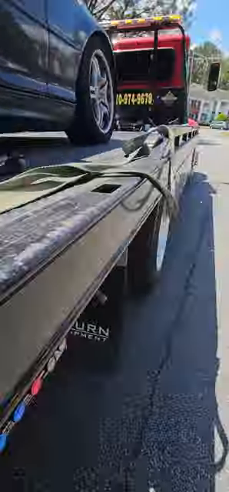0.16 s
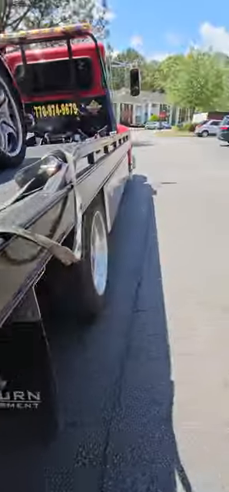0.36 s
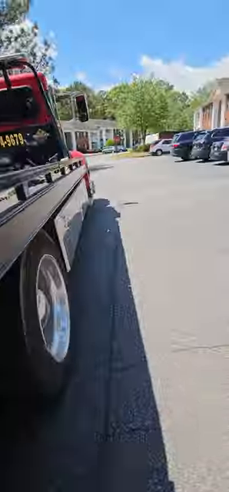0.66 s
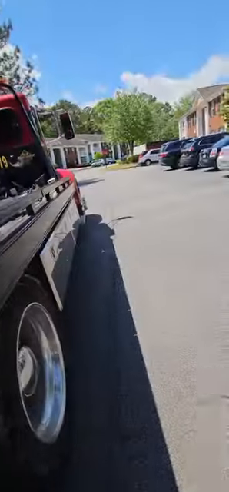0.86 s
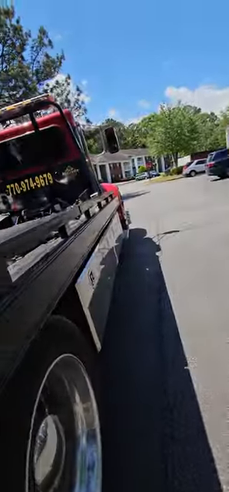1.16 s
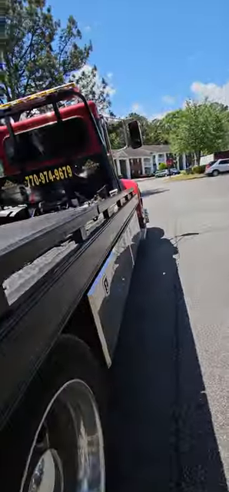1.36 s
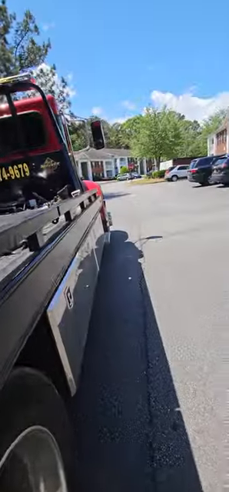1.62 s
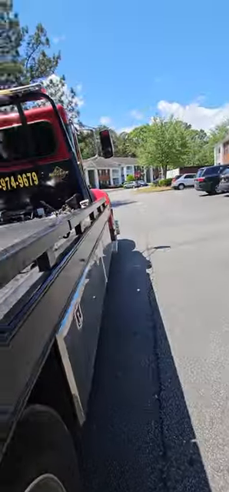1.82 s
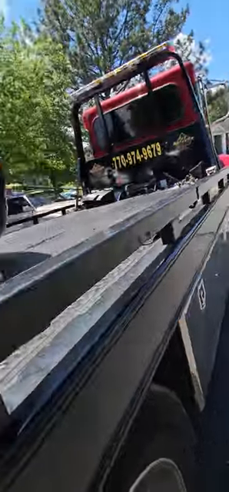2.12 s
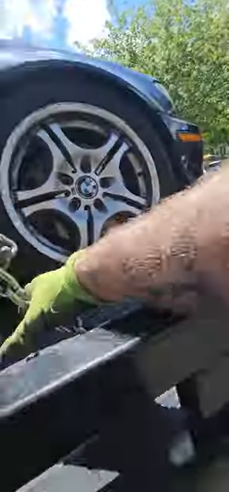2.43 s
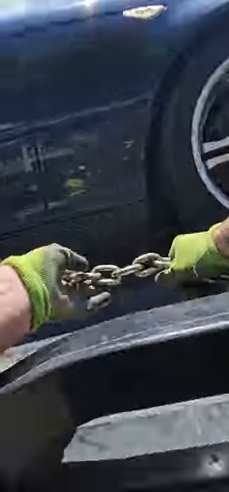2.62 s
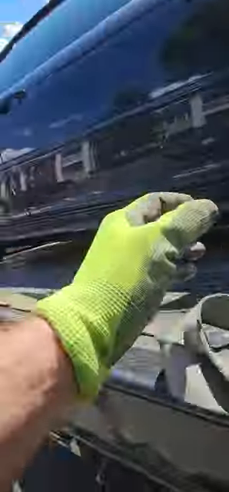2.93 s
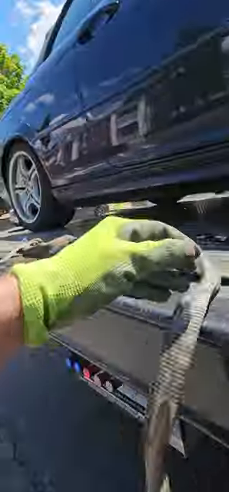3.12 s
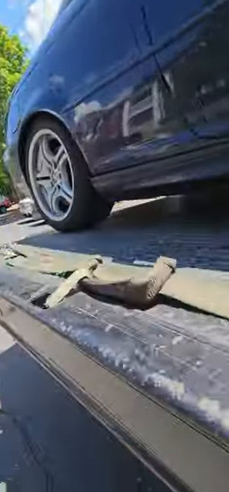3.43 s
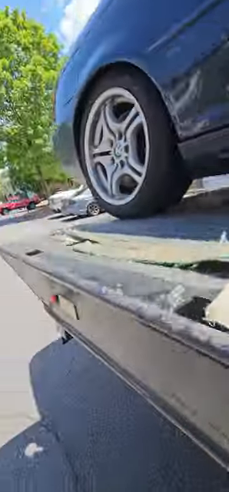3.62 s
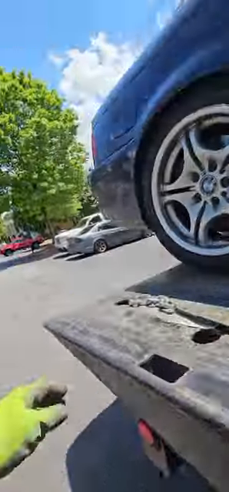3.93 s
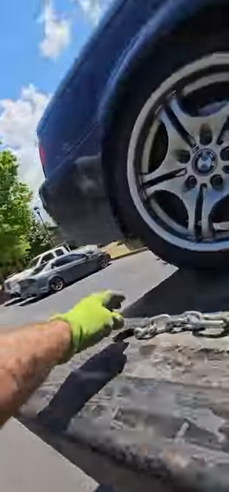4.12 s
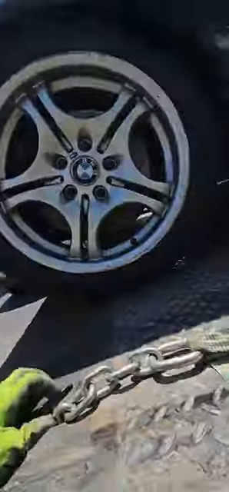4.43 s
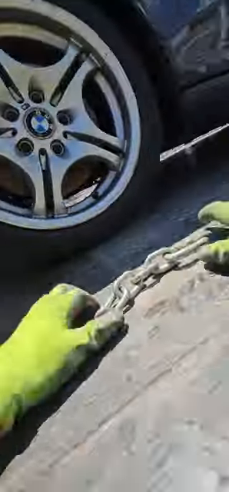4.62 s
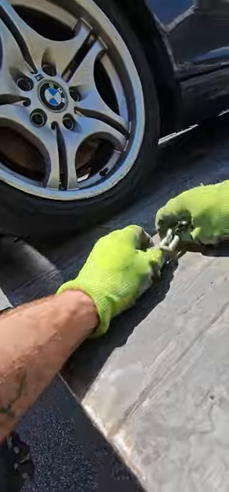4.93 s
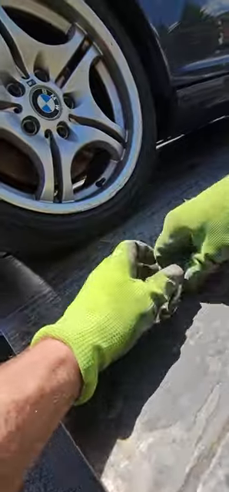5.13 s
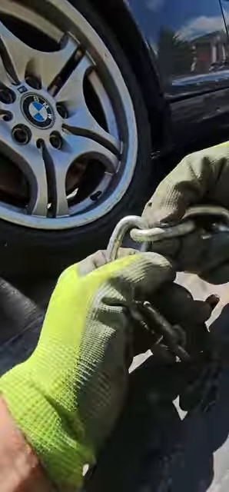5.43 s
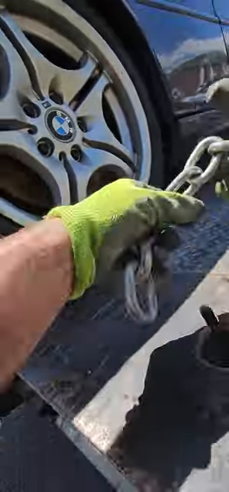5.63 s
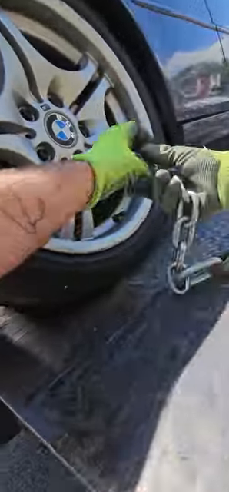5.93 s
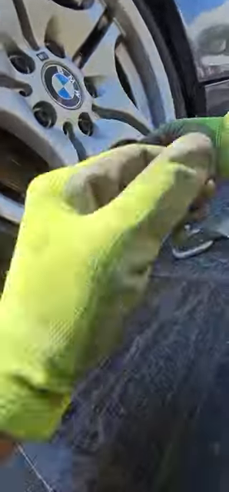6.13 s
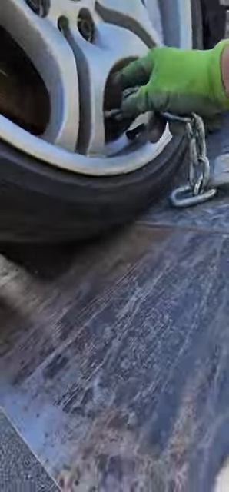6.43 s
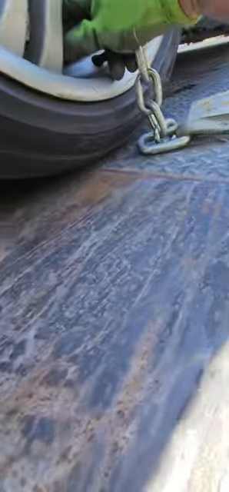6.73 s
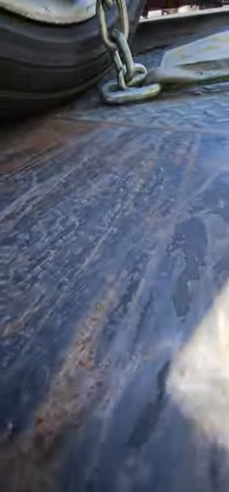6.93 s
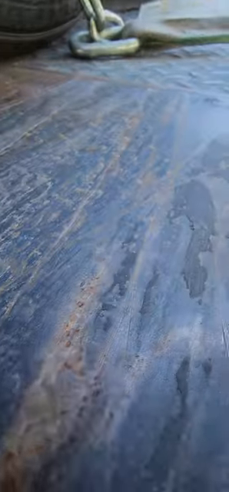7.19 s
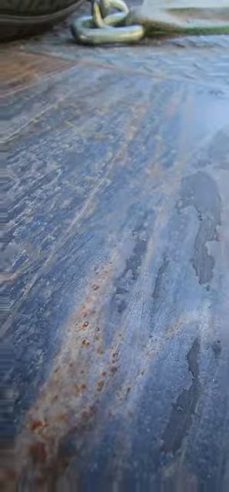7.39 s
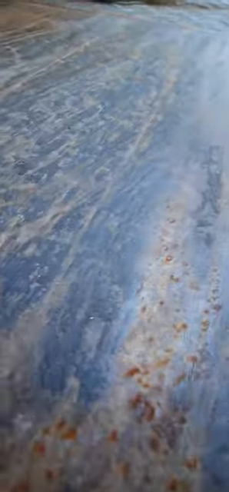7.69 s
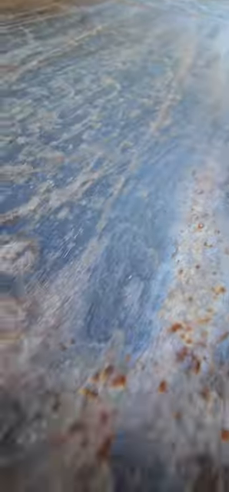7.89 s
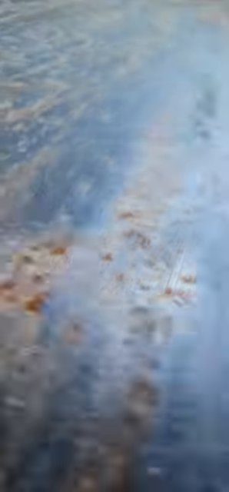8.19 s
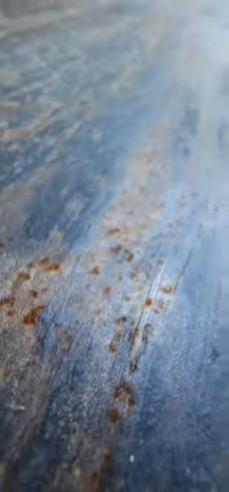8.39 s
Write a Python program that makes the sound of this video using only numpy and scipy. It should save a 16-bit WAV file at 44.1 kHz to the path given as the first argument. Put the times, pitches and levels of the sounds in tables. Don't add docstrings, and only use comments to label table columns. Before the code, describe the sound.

Outdoors, a large diesel truck idles without stopping: low pulsing exhaust, rough engine clatter, faint gear whine and airy hiss, with a steady low-mid pump hum that shifts in strength as the hand-held microphone moves. A hard, dull double knock opens the scene, then mostly engine until about 1.7 s. Around 1.9-2.6 s metal scrapes, thuds and snaps, with a small buckle and bright links ringing. At 2.8 s a chain drops heavily on the steel deck, with small clinks trailing to 3.3 s. The engine is alone, somewhat softer, until 4.3 s, when a second chain is dragged and gathered with glove rustle, clustering around 4.9-5.1 and 5.4-6.1 s with thuds and a ringing hook. Sparse light taps follow from 6.2 to 7.8 s; the hum swells, then chain jangles sharply around 8 s, ending in small clinks by 8.5 s.

```python
import sys
import numpy as np
from scipy import signal
from scipy.fft import rfft, irfft, next_fast_len
from scipy.io import wavfile
from scipy.ndimage import uniform_filter1d, map_coordinates

SR = 44100
rng = np.random.default_rng(int(sys.argv[2]) if len(sys.argv) > 2 else 0)


def voltage_ratio(decibels):
    exponent = np.asarray(decibels, float) / 20
    return 10 ** exponent


def master(y):
    cut = np.clip(np.atleast_2d(y).T, -1, 1)
    pcm = np.round(cut * 32767)
    wavfile.write(sys.argv[1], SR, pcm.astype(np.int16))


N = 377055

# time in seconds, exhaust loudness in dB, nearness of the engine bay in dB.
ENGINE_DISTANCE = [(0.0, -24.5, -33), (0.09, -26.5, -36), (0.55, -28.5, -31.5), (2.0, -29.5, -27.5),
                   (2.83, -32, -33.5), (3.31, -32.5, -45), (4.2, -29.5, -47), (4.43, -30, -45.5),
                   (5.17, -32, -35.5), (5.76, -29.5, -44.5), (6.14, -29.5, -36.5), (6.38, -29, -43),
                   (7.86, -26.5, -38.5), (8.5, -27.5, -37.5), (8.55, -34, -43)]


def unit(x):
    return x / np.sqrt(np.mean(x ** 2) + 1e-20)


def along(points, hz):
    f, v = np.transpose(points)
    return np.interp(np.log(hz + 1), np.log(f + 1), v)


def curves(rows):
    s, *cols = np.transpose(rows)
    return [np.interp(np.arange(N) / SR, s, c) for c in cols]


def wobble(rate):
    knots = rng.standard_normal(int(N * rate / SR) + 4)
    return map_coordinates(knots, [np.arange(N) * rate / SR])


def filtered(x, response):
    m = next_fast_len(N + SR // 2)
    return irfft(rfft(x, m) * response(np.fft.rfftfreq(m, 1 / SR)), m)[..., :N]


def resonant(x, peaks):
    def response(f):
        total = 0
        for k, (centre, width, db) in enumerate(peaks):
            damping = 1j * f * width
            total = total + (-1) ** k * voltage_ratio(db) * damping / (centre * centre - f * f + damping)
        return unit(np.abs(total)) * np.exp(1j * np.angle(total))
    return filtered(x, response)


def tuned(x, hz, sharpness):
    return signal.lfilter(*signal.iirpeak(hz, sharpness, SR), x) * np.sqrt(SR * sharpness / (np.pi * hz))


def sides(pan_db):
    return voltage_ratio(np.array([pan_db / 2, -pan_db / 2]))


def add(out, s, sound):
    part = out[:, round(s * SR):][:, :sound.shape[1]]
    part += sound[:, :part.shape[1]]


def rush(spectrum, patchy_db):
    # frequency in Hz, likeness of left and right (1 is mono).
    likeness = [(60, 0.79), (130, 0.54), (290, 0.37), (640, 0.24), (1410, 0.028), (3100, -0.18),
                (6820, 0.033), (15000, -0.077)]
    z = signal.stft(rng.standard_normal((2, N)), nperseg=512)[2]
    field = uniform_filter1d(rng.standard_normal(z.shape[1:]), size=6, axis=0)
    field = uniform_filter1d(field, size=14, axis=1)
    pair = signal.istft(z * voltage_ratio(patchy_db * unit(field)), nperseg=512)[1][:, :N]

    def response(hz):
        angle = np.arccos(np.clip(along(likeness, hz), -1, 1)) / 2
        return voltage_ratio(along(spectrum, hz)) * [np.cos(angle), np.sin(angle)]
    mid, side = filtered(pair, response)
    return np.array([mid + side, mid - side]) / np.sqrt(np.mean(mid ** 2))


def tones(turns, orders, unsteady_db, rate):
    total = 0
    for multiple, db in orders:
        swell = np.sqrt(2) * voltage_ratio(db + unsteady_db * wobble(rate))
        total = total + swell * np.sin(2 * np.pi * (multiple * turns + rng.random()))
    return total


def rustle_db():
    # start in seconds, length in seconds, level in dB.
    rustles = [
        (4.235, 2.1, -48),
        (7.699, .85, -52.5),
    ]
    t = np.arange(N) / SR
    return sum(voltage_ratio(db) * np.clip(np.minimum(t - s, s + length - t) / 0.057, 0, 1) for s, length, db in rustles)


def engine():
    # shaft order, level in dB; exhaust orders set by the firing.
    firing_orders = [(3, -24.5), (4, -12.5), (5, -23), (6, 2.5), (7, -23)]
    # shaft order, level in dB; the other orders from the block.
    odd_orders = [(8, -3.5), (9, -1.5), (10, -18.5), (12, -11.5), (13, -16), (15, -10), (17, -14),
                  (18, -23)]
    cylinders = [0, -1.8, -1.5]
    # frequency in Hz, level in dB re clatter.
    gear_whines = [(441, -9.5), (834, -3.5)]
    # frequency in Hz, level in dB per Hz.
    clatter_colour = [(90, -44.5), (150, -11.5), (350, -17), (530, -15.5), (1000, -25), (2000, -28.5),
                      (6000, -44.5), (9000, -87.5)]
    # frequency in Hz, level in dB per Hz.
    rumble_colour = [(12, -51), (20, -16), (65, -4), (195, -25), (247, -6), (304, -21), (700, -26),
                     (910, -62.5)]
    # frequency in Hz, level in dB per Hz.
    hiss_colour = [(1800, -16), (3500, -11), (5400, -17), (8500, -18), (10200, -25.5), (11500, -15.5),
                   (12500, -19.5), (16000, -12.5)]
    exhaust_db, clatter_db = curves(ENGINE_DISTANCE)
    near_db = clatter_db + 38
    odd_db = exhaust_db - 5 + 0.26 * near_db
    hiss_db = -51 + 1.24 * near_db
    t = np.arange(N) / SR
    shaft_hz = 11.56
    turns = shaft_hz * t + 0.013 * wobble(3)
    low = voltage_ratio(exhaust_db) * tones(turns, firing_orders, unsteady_db=-1.0, rate=2.7)
    low = low + voltage_ratio(odd_db) * tones(turns, odd_orders, unsteady_db=3.5, rate=4.6)
    rumble = voltage_ratio(odd_db + 1.5) * rush(rumble_colour, patchy_db=1.5)
    firing = len(cylinders) * turns
    strength = voltage_ratio(np.array(cylinders)[firing.astype(int) % len(cylinders)])
    knock = strength * np.exp(-3 * (firing % 1))
    clatter = voltage_ratio(clatter_db + 1.5) * unit(1 + 0.443 * knock) * rush(clatter_colour, patchy_db=1.5)
    whine = tones(t + 2e-4 * wobble(7), gear_whines, unsteady_db=1.5, rate=4)
    gears = voltage_ratio(1.06 * (clatter_db + 30.5) - 40.5) * whine
    hiss = np.hypot(voltage_ratio(hiss_db), rustle_db()) * rush(hiss_colour, patchy_db=0.6)
    return low * sides(1.0)[:, None] + rumble + clatter + gears + hiss


def pump():
    # time in seconds, hum in dB, octave in dB, left over right in dB.
    pump_distance = [(0.0, -19, -31.5, 2), (0.45, -21, -43, -3.5), (2.31, -25, -32.5, 6),
                     (2.66, -20, -47, 5), (2.83, -25.5, -34.5, 6), (3.36, -33.5, -52.5, 3),
                     (4.86, -23.5, -38, 2.5), (5.93, -22, -49, 2), (7.76, -17, -44.5, 6.5),
                     (8.55, -21, -47, 7)]
    # multiple of the pump note, level in dB re clatter.
    overtones = [(3, -14.5), (4, -22), (6, -19.5), (9, -24.5), (12, -23)]
    hum_db, octave_db, pan_db = curves(pump_distance)
    clatter_db = curves(ENGINE_DISTANCE)[1]
    pump_hz = 248.66
    turns = pump_hz * np.arange(N) / SR + 0.047 * wobble(9)
    hum = voltage_ratio(hum_db) * tones(turns, [(1, 0)], unsteady_db=-0.18, rate=26) * sides(pan_db)
    octave = voltage_ratio(octave_db) * tones(turns, [(2, 0.0076)], unsteady_db=-1.0, rate=8.3) * sides(-pan_db / 2)
    return hum + octave + voltage_ratio(clatter_db) * tones(turns, overtones, unsteady_db=2.5, rate=6.4)


def ducking():
    # time in seconds, gain change in dB, recovery in seconds.
    ducks = [
        (2.838, 2.5, 0.25),
        (5.08, -1, 0.067),
        (6.09, -1.5, 0.23),
        (8.066, -5.5, 0.46),
    ]
    t = np.arange(N) / SR
    return voltage_ratio(sum(db * (t > s) * np.exp(-np.abs(t - s) / back) for s, db, back in ducks))


def yard(x):
    t60, delay = 0.07, 120
    t = np.arange(SR // 6) / SR
    tail = rng.standard_normal((2, len(t))) * voltage_ratio(-60 * t / t60)
    late = np.pad(x, ((0, 0), (delay, 0)))
    return signal.fftconvolve(late, tail / np.linalg.norm(tail[0]), axes=1)[:, :N]


def grit(count, depth_db, width):
    a, b, c = rng.standard_normal((3, count))
    grains = voltage_ratio(depth_db * np.repeat(c[::40], 40)[:count])
    return grains * np.array([a + width * b, a - width * b])


def clang(burst, hz, sharpness):
    plate = [0.975, 1.276, 0.756, 1.73, 2.23]
    tune, size = rng.standard_normal((2, len(plate)))
    level = voltage_ratio(2.5 * size - 8 * np.abs(np.log2(plate)))
    pitch = hz * np.array(plate) * (1 + 0.03 * tune)
    return sum(g * tuned(burst, f, sharpness) for g, f in zip(level, pitch))


def deck_scrapes():
    # start in seconds, length in seconds, level in dB, colour in Hz.
    scrapes = [(1.885, 0.28, -32.5, 636), (2.831, 0.082, -25.5, 2575), (4.276, 0.25, -41, 2010),
               (5.09, 0.073, -30, 2870), (6.089, 0.21, -37.5, 1505), (7.083, 0.055, -40, 1050),
               (7.204, 0.17, -44.5, 1140), (8.063, 0.086, -32.5, 1700), (8.463, 0.077, -43, 1195),
               (4.297, 0.2, -45, 594)]
    out = np.zeros((2, N))
    for s, length, db, hz in scrapes:
        u = np.arange(round(length * SR)) / (length * SR)
        links = voltage_ratio(3.5 * np.repeat(rng.standard_normal(len(u) // 300 + 1), 300)[:len(u)])
        stroke = np.sin(np.pi * u ** 0.6) * links * grit(count=len(u), depth_db=3, width=0.8)
        rubbed = tuned(stroke, hz, sharpness=0.71)
        add(out, s, voltage_ratio(db) * clang(rubbed, hz, sharpness=6.8) / 4)
    return out


def deck_thuds():
    # time in seconds, peak in dB, pitch in Hz.
    thuds = [(1.985, -16.5, 552), (2.039, -9.5, 394), (2.794, -5.5, 550), (2.816, -6, 654),
             (2.838, -8, 513), (2.922, -12, 570), (4.988, -15, 430), (5.447, -11.5, 506),
             (6.093, -11.5, 540)]
    out, t = np.zeros((2, N)), np.arange(SR // 7) / SR
    for s, db, hz in thuds:
        blow = voltage_ratio(db - 13.5 - 60 * t / 0.24) * grit(count=len(t), depth_db=4.5, width=0.23)
        add(out, s, tuned(blow, hz, sharpness=3.1))
    return out


def deck_knocks():
    # time in seconds, peak in dB, colour in Hz, decay by 60 dB in seconds.
    bumps = [(0.022, -3, 1510, 0.033), (0.049, -9, 3720, 0.032), (0.34, -27.5, 950, 0.055),
             (2.795, -11.5, 1010, 0.049), (2.836, -2, 1740, 0.068), (2.923, -21.5, 1080, 0.08),
             (3.018, -18, 1220, 0.069), (3.112, -17, 2180, 0.081), (3.257, -28.5, 1180, 0.066)]
    # seconds, dB, Hz, seconds.
    snaps = [(1.743, -19.5, 2180, 0.03), (1.942, -23, 1377, 0.042), (2.038, -9, 886, 0.066),
             (2.093, -21.5, 980, 0.041), (2.325, -13, 973, 0.045), (2.36, -18.5, 2030, 0.047),
             (2.432, -18, 3700, 0.035), (2.529, -22.5, 3490, 0.035), (2.556, -13.5, 3230, 0.026)]
    # seconds, dB, Hz, seconds.
    drags = [(4.312, -26.5, 1480, 0.043), (4.329, -20, 1470, 0.046), (4.373, -25, 2150, 0.032),
             (4.406, -12.5, 1830, 0.034), (4.806, -27, 996, 0.05), (4.875, -11.5, 2150, 0.077),
             (4.982, -9.5, 880, 0.06), (4.987, -9.5, 2180, 0.05), (5.005, -7, 2090, 0.058),
             (5.071, -18.5, 924, 0.041), (5.109, -14, 1740, 0.062), (5.234, -22.5, 1460, 0.062),
             (5.281, -20.5, 1680, 0.088), (5.445, -7.5, 1560, 0.043), (5.512, -22.5, 3240, 0.058),
             (5.841, -28, 4140, 0.064), (5.945, -15, 2070, 0.041)]
    # seconds, dB, Hz, seconds.
    taps = [(6.052, -4, 2030, 0.054), (6.091, -6.5, 1530, 0.054), (6.113, -8.5, 1600, 0.045),
            (6.24, -25.5, 1540, 0.054), (6.254, -16, 1340, 0.1), (6.3, -25.5, 1220, 0.045),
            (6.429, -24.5, 1280, 0.045), (6.539, -30, 1500, 0.045), (6.745, -22, 1060, 0.073),
            (6.83, -23.5, 1600, 0.037), (7.102, -24, 1090, 0.057), (7.321, -23.5, 2210, 0.028),
            (7.336, -19.5, 3240, 0.061), (7.854, -24.5, 1460, 0.051), (7.977, -11.5, 2840, 0.045),
            (8.037, -25.5, 1510, 0.054), (8.068, -13.5, 1536, 0.062), (8.167, -21, 1680, 0.041),
            (8.256, -15.5, 1640, 0.054), (8.469, -22, 1040, 0.045)]
    edge_levels = [
        -29,
        7.5,
        -21,
        -37.5,
    ]
    # frequency in Hz, width in Hz, level in dB.
    deck_body = [(1340, 650, 4), (2220, 540, 11), (3400, 1000, 2)]
    # frequency in Hz, width in Hz, level in dB.
    deck_edge = [(5080, 5200, 10), (7860, 1600, 18.5), (11500, 8900, 7.5)]
    body, spot, edge = np.zeros((3, 2, N))
    t = np.arange(SR // 7) / SR
    for rows, sharp_db in zip([bumps, snaps, drags, taps], edge_levels):
        for s, db, hz, t60 in rows:
            edge_db = sharp_db + 8 * np.log2(hz / 2000)
            choke = (t / max(t60, 0.008)) ** 1.4
            fade = voltage_ratio(db - 6 - 60 * choke) * (1 - np.exp(-t / 0.00068))
            burst = fade * grit(count=len(t), depth_db=1.5, width=0.98)
            add(body, s, burst * voltage_ratio(-7))
            add(spot, s, clang(burst, hz, sharpness=9) * voltage_ratio(-13))
            add(edge, s, burst * voltage_ratio(edge_db - 10 - 20 * choke))
    return resonant(body, deck_body) + spot + resonant(edge, deck_edge)


def ring(modes, attack):
    hz, db, life = np.transpose(modes)[:, :, None]
    life = np.clip(life, 0.01, 0.3)
    t = np.arange(round(life.max() * SR)) / SR
    tune, apart, phase = rng.standard_normal((3, len(modes), 1))
    drift = np.repeat(rng.standard_normal((len(modes), 90)), 150, axis=1)[:, :len(t)]
    arc = 2 * np.pi * hz * (1 + 0.002 * tune) * t + np.cumsum(0.004 * drift, axis=1)
    beat = 1 + 0.35 * np.sin(2 * np.pi * hz * 0.003 * apart * t + phase)
    choke = (t / life) ** 1.7
    fade = voltage_ratio(db - 60 * choke) * (1 - np.exp(-t / attack)) * beat
    return np.array([(fade * np.sin(arc + phase)).sum(0), (fade * np.sin(arc - phase)).sum(0)])


def struck(hits, modes, coloured, attack):
    out = np.zeros((2, N))
    for s, db, colour_db in hits:
        now = [(hz, db + level + c * colour_db, t60) for (hz, level, t60), c in zip(modes, coloured)]
        add(out, s, ring(now, attack))
    return out


def buckle():
    # frequency in Hz, level in dB, ring in seconds.
    buckle_modes = [(3540, -17, 0.019), (6330, 3, 0.026), (9120, -13.5, 0.03), (10600, -3.5, 0.032),
                    (11400, 4.5, 0.015)]
    # time in seconds, peak in dB, upper modes in dB.
    buckle_hits = [(2.325, -0.5, -23.5), (2.3644, -44.5, -16), (2.4392, 1, -16.5), (2.4833, -32.5, -1.5),
                   (2.5321, -14, 6), (2.5561, -29, -9.5)]
    return struck(buckle_hits, buckle_modes, [0.14, 0.37, 0.02, 0.69, 0.97], attack=0.0023)


def hook():
    # frequency in Hz, level in dB, ring in seconds.
    hook_modes = [(7380, 0, 0.055), (7530, -0.5, 0.046), (8190, -6.5, 0.041), (8354, -4.5, 0.09)]
    # time in seconds, peak in dB, lower modes in dB.
    hook_hits = [(5.7947, -21, -5), (5.8431, -36, -4), (5.9467, -42, 6), (5.9948, -37, 2), (6.0142, -9, -5),
                 (6.0552, -25.5, 1), (6.095, -22, -2.5), (6.2173, -28, -28), (6.2397, -19.5, -9.5),
                 (6.2696, -10.5, -21), (6.536, -21, -12), (6.6403, -52, -10), (6.7471, -33, -10)]
    return struck(hook_hits, hook_modes, [1, 1, 0, 0], attack=0.00049)


def chain(clinks, link):
    rings, cracks = np.zeros((2, 2, N))
    t = np.arange(SR // 20) / SR
    for s, db, hz, life in clinks:
        modes = [(f, db - 5 - 8 * abs(f - hz) / 1000, life) for f in link]
        add(rings, s, ring(modes, attack=0.00043))
        add(cracks, s, voltage_ratio(db - 6.5 - 60 * t / 0.0095) * rng.standard_normal((2, len(t))))
    return rings + resonant(cracks, [(14200, 2500, 0), (9000, 6000, -15)])


def first_chain():
    first_link = [13361, 14126, 13000]
    # time in seconds, peak in dB, favoured pitch in Hz, ring in seconds.
    dropped = [(2.0443, -18, 14900, 0.098), (2.2722, -21.5, 13400, 0.11), (2.3266, -3, 14800, 0.055),
               (2.436, -7.5, 14300, 0.062), (2.516, -21, 15400, 0.069), (2.5321, -14.5, 14500, 0.08),
               (2.558, -11, 15200, 0.046), (2.6445, -22, 13100, 0.054), (2.7536, -5.5, 13800, 0.05),
               (2.797, -18, 13300, 0.069), (2.839, -6, 13300, 0.1), (2.8634, 0.5, 13500, 0.1),
               (2.9941, -26, 14300, 0.13), (3.0754, -29.5, 13300, 0.11), (3.104, -27.5, 14300, 0.13),
               (3.1896, -33.5, 13400, 0.092)]
    return chain(dropped, first_link)


def second_chain():
    second_link = [13315, 13930, 14730]
    # time in seconds, peak in dB, favoured pitch
    # in Hz, ring in seconds.
    second_clinks = [(4.327, -13, 14600, 0.09), (4.336, -12.5, 13900, 0.13), (4.4054, -21.5, 13400, 0.086),
                     (4.4682, -25, 15200, 0.09), (4.807, -20.5, 15360, 0.058), (4.8745, -9.5, 14500, 0.079),
                     (4.98, -11, 13960, 0.09), (5.0758, -9, 13540, 0.099), (5.094, -7, 14300, 0.071),
                     (5.1098, -3.5, 14700, 0.09), (5.243, -31, 13700, 0.073), (5.2824, -27, 13500, 0.098),
                     (5.42, -23, 13650, 0.083), (5.434, -20.5, 14900, 0.07), (5.4975, -20.5, 14800, 0.1),
                     (5.5167, -7, 14200, 0.11), (5.5694, -5.5, 14000, 0.082), (5.692, -14.5, 14260, 0.051),
                     (5.7706, -22.5, 13900, 0.09), (5.7953, -10.5, 15200, 0.041), (5.8426, -14, 14700, 0.056),
                     (5.8561, -6, 14400, 0.068), (5.9512, -10.5, 13300, 0.06), (5.9958, -9.5, 13900, 0.09),
                     (6.0212, -10, 13970, 0.052), (6.0586, -14, 14700, 0.082), (6.0799, -15.5, 14000, 0.1),
                 (6.095, -9.5, 13650, 0.12), (6.2398, -24.5, 14800, 0.09), (6.2721, -21.5, 13300, 0.1),
                 (6.2994, -18.5, 14700, 0.098), (6.335, -13, 13300, 0.16), (6.5363, -22, 13300, 0.09),
                 (6.6418, -29, 13500, 0.099), (6.748, -27, 13950, 0.098), (7.4071, -30.5, 14000, 0.081),
                 (7.7958, -28.5, 14050, 0.07), (7.8234, -26.5, 14100, 0.09), (7.887, -30.5, 13500, 0.082),
                 (7.905, -19.5, 14060, 0.12), (7.979, -8, 13700, 0.09), (8.0002, -13.5, 13440, 0.11),
                 (8.0638, -6.5, 13850, 0.12), (8.0974, -8, 13300, 0.12), (8.1673, -16.5, 13300, 0.11),
                 (8.2566, -30, 13400, 0.098), (8.317, -19, 13800, 0.051), (8.3546, -14.5, 14100, 0.066),
                 (8.4193, -41.5, 13900, 0.072), (8.4455, -15.5, 13270, 0.09), (8.4682, -10, 14100, 0.046)]
    return chain(second_clinks, second_link)


def scene():
    # time in seconds, left over right in dB.
    hands = [(0, -1), (2, 0.5), (3.2, 4.5), (4.3, -1), (5.45, 3), (6, 0), (7.3, 8), (8.5, 6.5)]
    metal = deck_scrapes() + deck_thuds() + deck_knocks()
    metal = metal + buckle() + hook() + first_chain() + second_chain()
    metal = metal * sides(curves(hands)[0])
    return (engine() + pump()) * ducking() + metal + voltage_ratio(-11) * yard(metal)


def band_limit(x):
    return signal.sosfilt(signal.butter(12, 16490, fs=SR, output="sos"), x)


def record(dry):
    top_hz, bass_hz = 15750, 28
    clipped = dry / (1 + np.abs(dry) ** 6) ** (1 / 6)

    def response(hz):
        return np.where(hz < top_hz, 1, voltage_ratio(-27)) * hz ** 2 / (hz ** 2 + bass_hz ** 2)
    banded = filtered(clipped, response)
    return band_limit(banded)


dry = scene()
out = record(dry)
master(out)
```